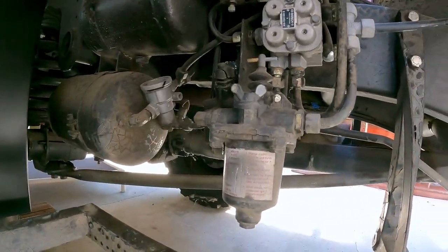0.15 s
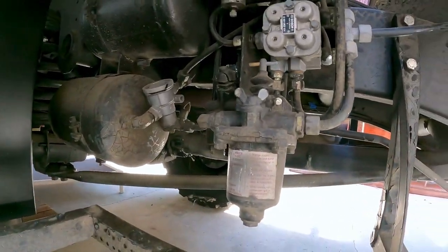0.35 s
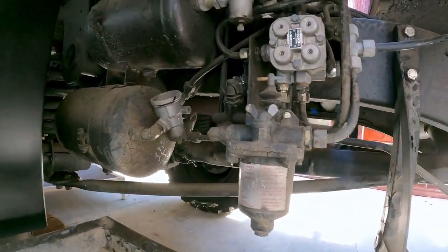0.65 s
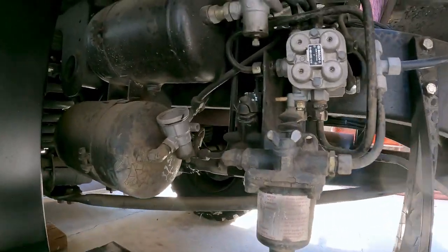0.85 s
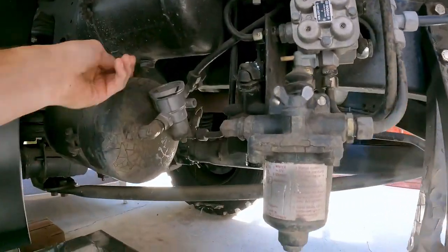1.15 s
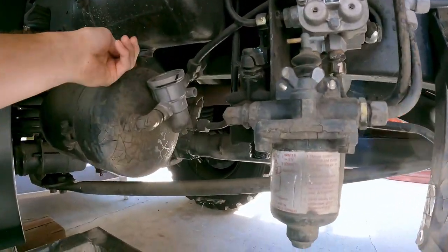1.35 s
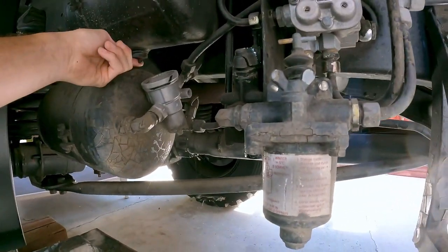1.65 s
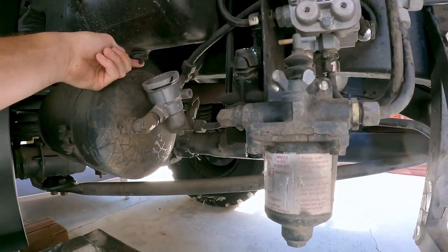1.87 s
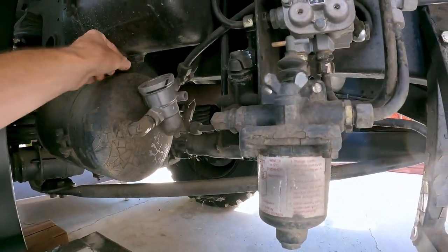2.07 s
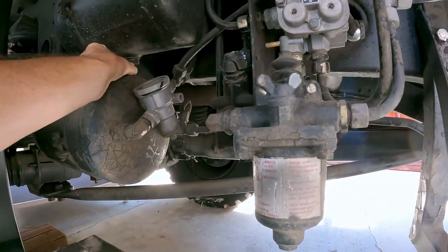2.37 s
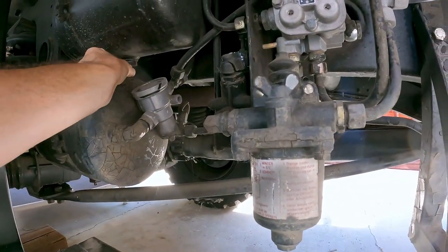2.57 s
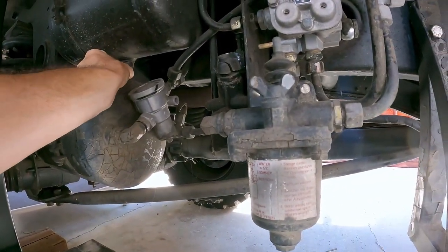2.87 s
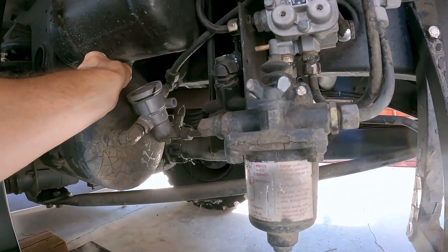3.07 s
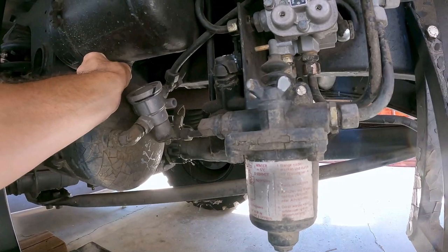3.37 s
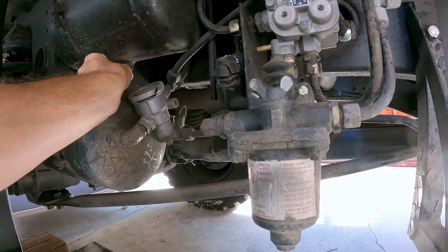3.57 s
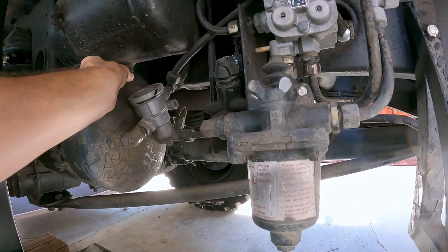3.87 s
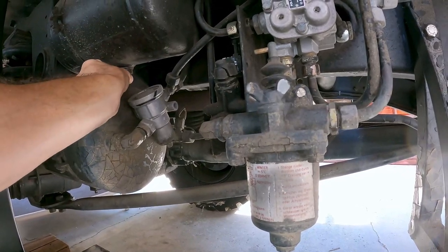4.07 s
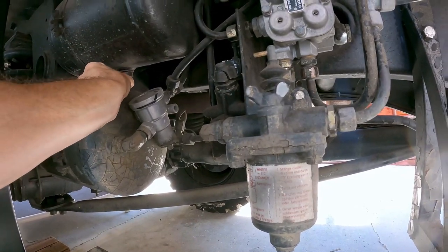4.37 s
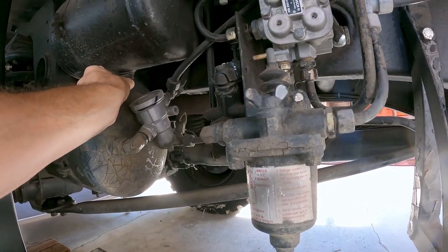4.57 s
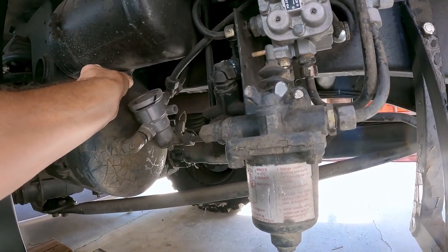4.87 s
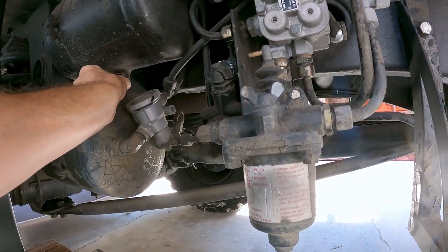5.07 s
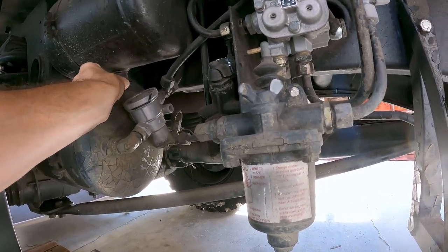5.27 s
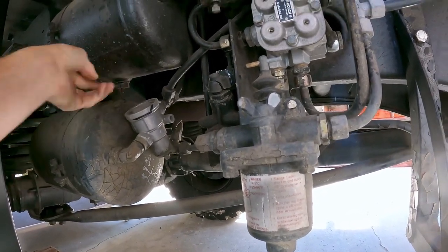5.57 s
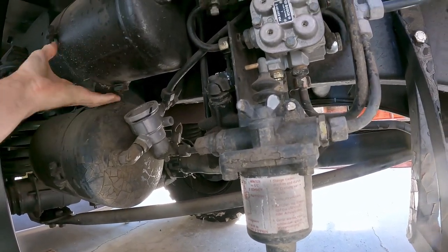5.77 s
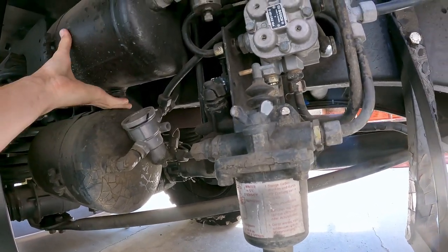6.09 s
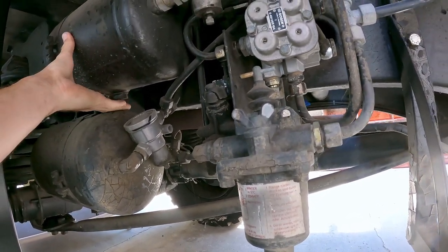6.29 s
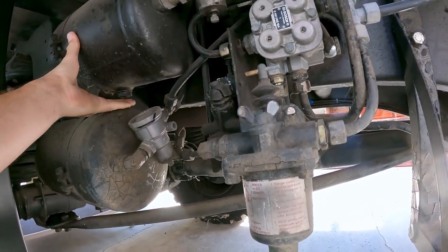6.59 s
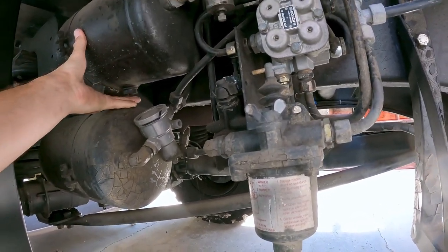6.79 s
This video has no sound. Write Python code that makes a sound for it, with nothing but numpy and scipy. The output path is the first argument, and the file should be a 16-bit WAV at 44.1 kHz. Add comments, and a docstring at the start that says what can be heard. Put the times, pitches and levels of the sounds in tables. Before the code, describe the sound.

A hand-held microphone picks up a small steady air leak, deep buffeting, rubbing and hollow handling thumps. The hiss swells, cuts out, and leaves a quiet workshop pause. Then pressurised air roars from the valve, loud and sharp, with a short falling squeak. Fingers bend the jet, shifting it between whistling, hissing and rougher roar among steel tanks with short metallic echoes.

```python
"""Air tank drain valve under a truck

Under a parked truck a hand works a leaking valve: a thin hiss, a pause, then a hard jet that the fingers deflect.
Leak and jet are coloured noise with resonances and short echoes for the steel; a sliding sine makes a squeak.
Low noise buffets the hand-held microphone, band noise rustles and damped sines knock on its housing.
A faint, steady noise is the quiet of the workshop.
"""
import sys
import numpy as np
from scipy import signal
from scipy.fft import rfft, irfft, next_fast_len
from scipy.io import wavfile
from scipy.ndimage import uniform_filter1d

SR = 44100
rng = np.random.default_rng(int(sys.argv[2]) if len(sys.argv) > 2 else 0)


def wav_record(signal):
    """Record a signal, one row per channel, as 16-bit PCM in the file named by sys.argv[1]."""
    frames = np.transpose(np.atleast_2d(signal))
    bounded = np.clip(frames, -1, 1)
    # unit amplitude maps onto the largest positive 16-bit level
    quanta = np.round(bounded * 32767).astype(np.int16)
    wavfile.write(sys.argv[1], SR, quanta)


N = 305833  # samples
HZ = np.arange(next_fast_len(N) // 2 + 1) * SR / next_fast_len(N) + 1e-3  # just above 0, so its log exists
# borders between the bands of the moving air
DRONE_TOP_HZ, ROAR_TOP_HZ, CORE_TOP_HZ = 2260, 6090, 8510
OPENING_S = .03  # fade of the jet's start and of the leak's end


def undb(db):
    """Turn decibels into a gain."""
    return 10 ** (np.asarray(db) / 20)


def curve(table):
    """Draw straight lines through a table that starts with t/s; give each other column at every sample."""
    s, *columns = np.transpose(table)
    return [np.interp(np.arange(N) / SR, s, c) for c in columns]


def shape(x, gain):
    """Filter a sound by a gain given at the frequencies HZ."""
    return irfft(rfft(x, next_fast_len(N)) * gain, next_fast_len(N))[:N]


def slope(points):
    """Join (f/Hz, level/dB) points on a log-frequency axis into a gain."""
    hz, db = np.transpose(points)
    return undb(np.interp(np.log(HZ), np.log(hz), db))


def noise(colour, lo_hz=1, hi_hz=17000):
    """Make coloured noise between two soft edges, rms 1."""
    low_edge = np.exp(-np.logaddexp(0, 20 * np.log(lo_hz / HZ)) / 2)
    high_edge = np.exp(-np.logaddexp(0, 20 * np.log(HZ / hi_hz)) / 2)
    spectrum = rng.standard_normal((len(HZ), 2)) @ [1, 1j]
    x = irfft(colour * low_edge * high_edge * spectrum, next_fast_len(N))[:N]
    return x / np.std(x)


def walk(rate):
    """Wander at random: levels held 1 / rate seconds and smoothed twice; spread near 1."""
    hold = int(SR / rate)
    steps = np.repeat(rng.standard_normal(N // hold + 1), hold)
    return uniform_filter1d(uniform_filter1d(steps, hold), hold)[:N] * 4 / 3


def peak(hz, width):
    """One resonance, gain 1 at its centre and 1/2 at half the width to either side."""
    return 1 / (1 + (2 * (HZ - hz) / width) ** 2)


def ringing(modes):
    """Let narrow resonances stand above broad noise of gain 1."""
    return 1 + sum(undb(db) / 2 * peak(hz, width) for hz, width, db in modes)


def whistle(hz, width):
    """Make a narrow band of noise whose centre may move."""
    turn = 2 * np.pi * np.cumsum(hz) / SR
    return noise(peak(0, width)) * np.cos(turn) + noise(peak(0, width)) * np.sin(turn)


def leak():
    """A small flow, airy and bright, that stops when the valve seats."""
    # the thin leak until it closes: t/s, hiss level/dB, low edge over the hiss/dB
    leak_levels = [(0.0, -35, -1), (0.1, -35, -9), (0.33, -34, -5), (0.4, -35.5, -8), (1.51, -35.5, -7),
                   (1.55, -30, -9), (1.61, -33, -6), (1.79, -31.5, -8), (1.82, -42, -9),
                   (1.94, -24.5, -14.5), (1.99, -31, -14), (2.01, -41, -11), (2.035, -47, 7),
                   (2.07, -64, 11)]
    # colour of the leaking air: f/Hz, level/dB per Hz
    leak_colour = [(1200, -9.5), (1800, -10.5), (3000, -7), (4500, -7.5), (6000, -6.5), (9000, -3),
                   (12500, -1.5), (15700, -7.5)]
    # resonances of the touched leak: f/Hz, width/Hz, strength/dB (0 dB adds half the plain gain)
    leak_ring = [(2110, 100, 13), (2620, 89, 8), (3700, 120, 9), (5650, 200, 2)]
    touch_s = 1.53  # fingers at the valve: from here the leak rings

    hiss_db, edge_db = curve(list(leak_levels) + [(leak_levels[-1][0] + OPENING_S, -90, 0)])
    colour = slope(leak_colour)
    touched = np.arange(N) / SR > touch_s
    hiss = noise(colour, ROAR_TOP_HZ) * undb(.85 * walk(23))
    ringing_edge = noise(colour * ringing(leak_ring), 1100, ROAR_TOP_HZ)
    plain_edge = noise(colour, 1100, ROAR_TOP_HZ)
    edge = np.where(touched, ringing_edge, plain_edge)
    return (hiss + edge * undb(edge_db + 0.54 * walk(14.7))) * undb(hiss_db)


def chassis(x):
    """Tanks and frame give dense short echoes, duller than the air; the pattern shifts as hand and mic move."""
    t60_s, echo_db, dull_hz = 0.087, -6, 8000  # time to fall by 60 dB, level of the lows, where the treble fades
    t = np.arange(4000) / SR
    turn = np.pi * walk(2.5)
    dull = undb(echo_db) / np.sqrt(1 + (HZ / dull_hz) ** 2)
    echoes = 0
    for share in np.cos(turn), np.sin(turn):  # blend two echo patterns
        echo = rng.standard_normal(len(t)) * 1000 ** (-t / t60_s)
        echo_gain = rfft(echo / np.linalg.norm(echo), next_fast_len(N))
        echoes = echoes + share * shape(x, dull * echo_gain)
    return shape(x + echoes, 1 / np.sqrt(1 + dull ** 2))  # make up for the added power


def buffet():
    """Air on the microphone: slow, gusty pressure swings on the diaphragm."""
    # levels: t/s, deep buffeting/dB, boom of the housing/dB, murmur of the shop/dB
    buffet_levels = [(0.0, -14, -34, -35), (0.08, -16, -40, -42), (0.65, -14.5, -37, -41),
                     (0.85, -12, -31, -44), (1.45, -11, -30, -42), (1.6, -13, -37, -46),
                     (1.75, -25, -40, -45), (3.26, -26.5, -38.5, -44), (3.42, -31, -46, -51),
                     (3.74, -41, -50, -48), (4.55, -37, -47, -53), (4.78, -25, -41, -46),
                     (5.06, -29, -45, -54), (5.92, -24.5, -40.5, -45), (6.74, -25, -35, -43),
                     (6.93, -29.5, -47, -52)]
    # colour of all three: f/Hz, level/dB per Hz
    buffet_colour = [(2, -10), (5, 0.5), (16, 9.5), (28, -7), (36, -13), (54, -10), (90, -19), (145, -25.5),
                     (205, -24), (310, -33), (620, -33.5), (900, -36.5), (1300, -47)]

    deep_db, boom_db, murmur_db = curve(buffet_levels)
    colour = slope(buffet_colour)
    deep = noise(colour, 3.3, 54.7) * undb(deep_db + 1.6 * walk(7.8))
    boom = noise(colour, 67, 305) * undb(boom_db + 1.6 * walk(12))
    murmur = noise(colour, 285, 1500) * undb(murmur_db + 1.2 * walk(10))
    return deep + boom + murmur


def workshop():
    """The quiet of the room: steady, faint coloured noise."""
    # colour of the room: f/Hz, level/dB per Hz
    shop_colour = [(530, -45), (900, -11.5), (1120, -9.5), (1350, -13.5), (2230, -15.5), (2490, -19),
                   (15700, -29)]
    return undb(-49) * noise(slope(shop_colour), 990)


def rustles():
    """Cloth of sleeve and grip rubbing: each rub is a swell of band noise."""
    # rubs: middle t/s, level/dB, centre f/Hz, half width/log frequency, length/s
    rubs = [(0.03, -36, 1200, 0.37, 0.1), (.2, -34, 800, .5, 0.024), (0.284, -31, 2200, 1, .015),
            (0.325, -38, 1480, .7, .05), (0.353, -40, 2500, 0.82, .02), (.58, -45, 1400, .12, .08),
            (.71, -41, 1400, 0.19, 0.085), (.98, -45, 1420, 0.12, 0.13), (1.2, -43, 1440, 0.13, 0.22),
            (1.35, -44.5, 1490, .15, 0.14)]

    t, out = np.arange(2 * SR) / SR, np.zeros(N)
    white = rng.standard_normal(len(t))
    for at, db, hz, width, length in rubs:
        band = signal.butter(2, hz * np.exp([-width, width]), "band", fs=SR, output="sos")
        rub = signal.sosfilt(band, white)
        swell = np.exp(-(2 * (t - at) / length) ** 2)
        out[:len(t)] += undb(db) * rub / np.std(rub) * swell
    return out


def knocks():
    """Knocks of the grip ring the housing as fading sines; brighter ones reach its upper modes."""
    # knocks: t/s, level/dB, brightness/gain per octave upward
    hits = [(0.162, -25.5, .1), (.194, -30, 0.69), (.4, -31, 0.1), (.673, -48, 1.6), (.695, -41.5, 3.1),
            (.94, -28, 0.33), (1.161, -25, 0.27), (1.199, -24.5, 0.09), (1.235, -23, 0),
            (1.312, -22.5, 0.033), (1.368, -26, 0.23), (1.412, -17.5, 0.033)]
    # modes of the housing: f/Hz, level/dB, time to fall by 60 dB/s
    housing = [(200, 0, 0.102), (233, 5.5, 0.097), (485, 4, 0.1), (950, -14, .04), (1410, -16, .05)]

    t, out = np.arange(SR // 5) / SR, np.zeros(N)
    for at, db, bright in hits:
        ring = 0
        for hz, mode_db, t60 in housing:
            gain = undb(mode_db) * bright ** np.log2(hz / housing[0][0])
            ring = ring + gain * np.sin(2 * np.pi * hz * t) * 1000 ** (-t / t60)
        start = int(at * SR)
        out[start:start + len(t)] += undb(db) * ring * (1 - np.exp(-t / 0.0019))  # soft contact
    return out


def jet():
    """Turbulent air from the pushed valve: all parts share the eddies that make the flow flutter."""
    # the flow: t/s, fine top hiss/dB, then over it: whistling core/dB, roar on hand and tank/dB
    jet_levels = [(3.14, -51, -1, -2), (3.18, -25, -4, -8), (3.22, -15, -1, -9), (3.29, -18, -1, -9),
                  (3.59, -21, -2, -9), (3.74, -23, -1, -6), (3.81, -27, -7, -6), (3.89, -21, -4, -5),
                  (4.03, -19, -2, -9), (4.21, -20, -2, -7), (4.34, -22, 2, -11), (4.59, -21, -1, -9),
                  (4.64, -27, -3, -6), (4.81, -16, -4, -11), (4.87, -22, 7, -4), (4.92, -24, 0, -8),
                  (5.08, -29, -1, -8), (5.22, -19, -1, -8), (5.28, -15, -5, -15), (5.31, -20, 3, -13),
                  (5.37, -26, -4, -7), (5.42, -23, -6, -9), (5.54, -22, -2, -5), (5.59, -26, -5, -5),
                  (5.84, -22, -4, -6), (6.09, -21, -3, -1), (6.16, -20, -4, -7), (6.2, -21, -1, 0),
                  (6.46, -23, 1, 2), (6.62, -19, -3, -5), (6.67, -15, -3, -5), (6.93, -21, -2, -7)]
    # how the hand turns the jet: t/s, hollow drone of the tanks over the roar/dB,
    # ring of the lower cavity over the core/dB, upper cavity f/Hz, tilt of the top hiss/dB per octave
    hand = [(3.2, -5, -17, 7400, 1), (3.4, -8, -17, 7550, 2), (3.75, -7.5, -17, 7700, 3),
            (3.9, -4.5, -9, 7200, 0), (4.1, -8, -15, 7600, 0), (4.33, -6.5, -22, 7250, -1),
            (4.46, -7, -16, 7600, -2), (4.58, -8, -11, 7250, -2), (4.88, -8, -3, 7300, 1),
            (5.05, -8.5, -15, 7550, 5), (5.3, -6, -18, 7850, -2), (5.5, -10, -4, 7400, 3),
            (6.0, -7.5, -6, 7200, 3), (6.45, -8, -2, 7200, 5), (6.7, -9, -3, 7550, 7),
            (6.93, -9.5, -6, 7500, 3)]
    # colour of the jet: f/Hz, level/dB per Hz
    jet_colour = [(410, -51), (700, -9), (885, -29.5), (957, -13), (1240, -16), (1360, -10), (2290, -12),
                  (2510, -11), (5540, -7.5), (7380, -2), (9090, -2.5), (13600, -0.5), (15700, -3.5)]
    # hollow steel parts that the air excites: f/Hz, width/Hz, strength/dB (0 dB adds half the plain gain)
    steel = [(1000, 38, 2), (1354, 73, 2), (2070, 160, 5), (2594, 160, 6.5), (3030, 55, 4.5),
             (3600, 95, -15), (3835, 130, 3.5), (4450, 60, -9), (5830, 100, -2.5), (8430, 150, -12),
             (9740, 150, -7), (9800, 160, -1), (10570, 110, 0), (12600, 200, -6), (13300, 490, -1)]
    lower_hz, lower_width_hz, upper_width_hz = 6450, 540, 520
    top_middle_hz = 11400  # the top hiss tilts about here

    opening = (jet_levels[0][0] - OPENING_S, -90, 0, 0)
    flow_db, core_db, roar_db = curve([opening] + list(jet_levels))
    drone_db, lower_db, upper_hz, tilt_db = curve(hand)
    colour = slope(jet_colour) * ringing(steel)

    # the upper cavity rings more as the core stands out, up to a limit
    upper_db = np.minimum(-2 + 1.5 * core_db, 1.1)
    lower_ring = noise(peak(lower_hz, lower_width_hz))
    upper_ring = whistle(upper_hz * (1 + .01 * walk(9)), upper_width_hz)
    core = noise(colour, ROAR_TOP_HZ, CORE_TOP_HZ)
    core += undb(lower_db + 1.5 * walk(12)) * lower_ring
    core += undb(upper_db + 1.5 * walk(12)) * upper_ring
    core /= np.sqrt(1 + undb(2 * lower_db) + undb(2 * upper_db))  # the rings share the core's power

    roar = noise(colour, DRONE_TOP_HZ, ROAR_TOP_HZ) * undb(roar_db + 0.76 * walk(15))
    drone = noise(colour, 823, DRONE_TOP_HZ) * undb(roar_db + drone_db + 0.7 * walk(12))
    top = noise(colour, CORE_TOP_HZ, top_middle_hz) * undb(-tilt_db / 4 + 0.67 * walk(22.1))
    top += noise(colour, top_middle_hz) * undb(tilt_db / 4 + 0.7 * walk(25))
    flutter_db = 0.9 * walk(14) + 0.61 * walk(300)
    return (core * undb(core_db) + roar + drone + top / np.sqrt(2)) * undb(flow_db + flutter_db)


def squeak():
    """The valve seat squeaks: a slightly rough sine slides down ever faster, falters once and breaks off."""
    start_s, length_s, level_db = 3.57, .09, -31.5
    from_hz, to_hz, bend = 1225, 880, 1.45  # a bend above 1 speeds up the slide
    catch_s, catch_length_s = 3.61, .006  # where it falters

    t = np.arange(N) / SR
    done = np.clip((t - start_s) / length_s, 0, 1)  # share of the squeak that is over
    hz = from_hz + (to_hz - from_hz) * done ** bend
    swell = np.sqrt(np.abs(np.sin(np.pi * done))) * (done < 1)
    falter = 1 - .6 * np.exp(-((t - catch_s) / catch_length_s) ** 2)
    level = np.sqrt(2) * undb(level_db + 1.5 * walk(90))
    rough_hz = hz * (1 + (0.004 + 0.04 * done ** 3) * walk(150))  # rougher toward the end
    return swell * falter * level * np.sin(2 * np.pi * np.cumsum(rough_hz) / SR)


def scene():
    """Place all sources at the centre; a faint smeared copy makes left and right differ slightly."""
    mid = chassis(leak() + jet()) + buffet() + workshop() + rustles() + knocks() + squeak()
    smear = rng.standard_normal(900)
    side = undb(-38) * signal.fftconvolve(mid, smear / np.linalg.norm(smear))[:N]
    return np.array([mid + side, mid - side])


def record(dry):
    """The loudest peaks are rounded softly; the path cuts the top steeply."""
    top_hz = 15720
    steep_cut = signal.ellip(14, .2, 85, top_hz, fs=SR, output="sos")
    return signal.sosfilt(steep_cut, np.tanh(dry))


dry = scene()
out = record(dry)
wav_record(out)
```